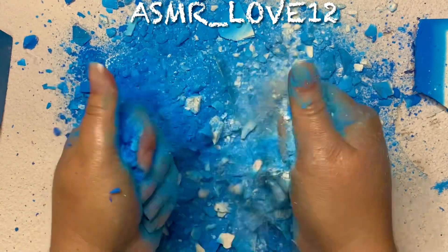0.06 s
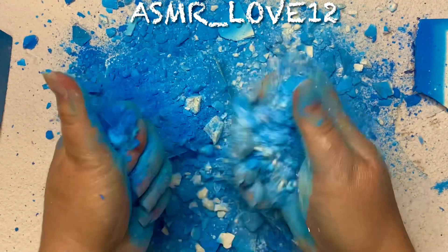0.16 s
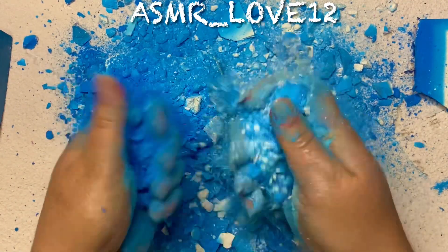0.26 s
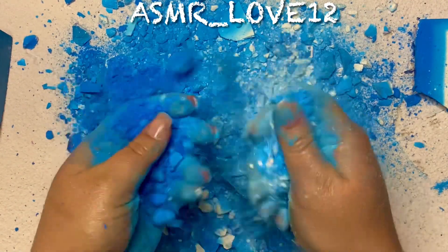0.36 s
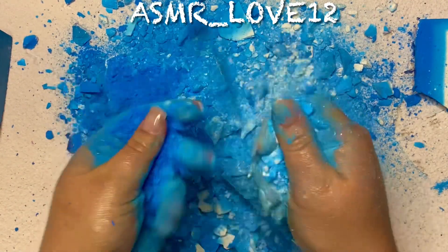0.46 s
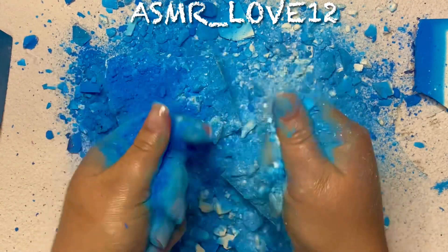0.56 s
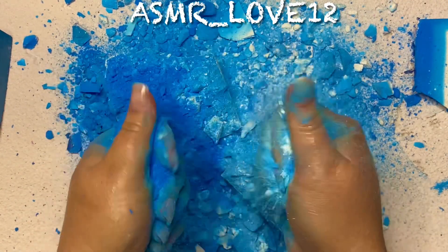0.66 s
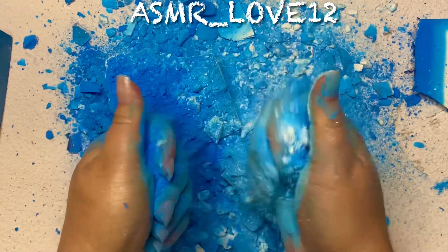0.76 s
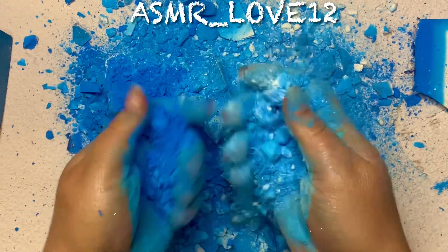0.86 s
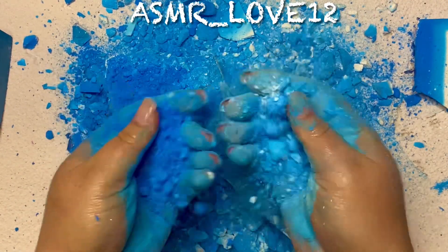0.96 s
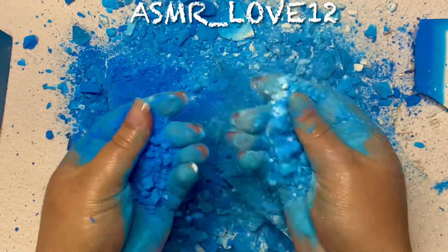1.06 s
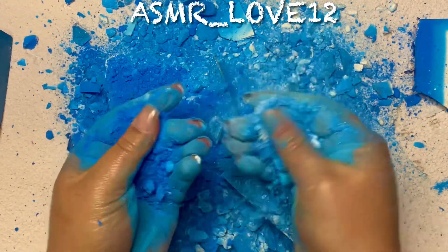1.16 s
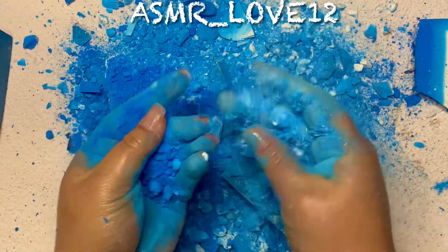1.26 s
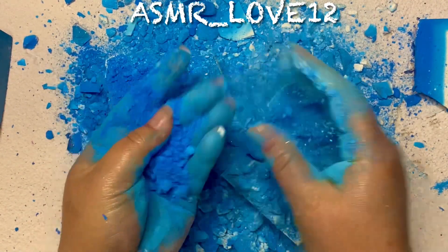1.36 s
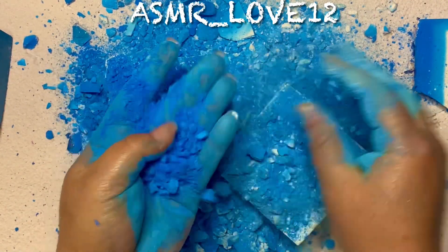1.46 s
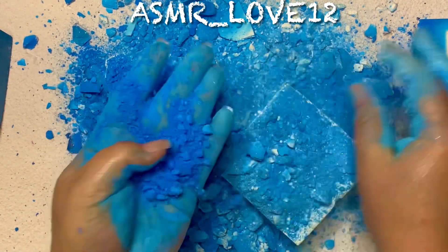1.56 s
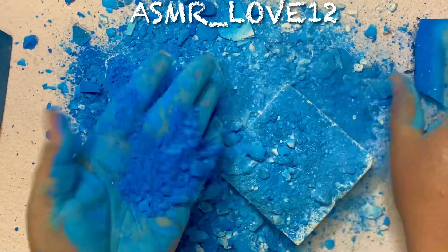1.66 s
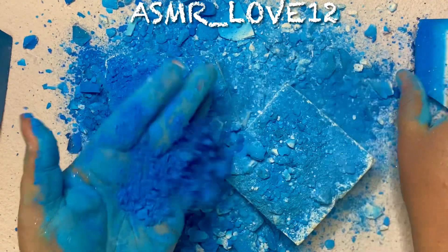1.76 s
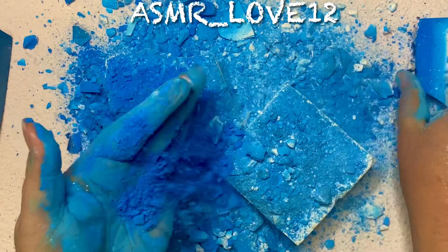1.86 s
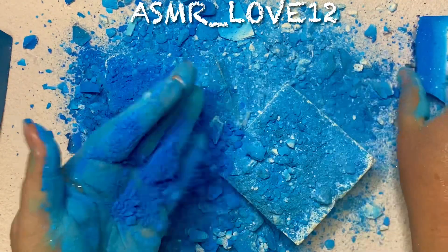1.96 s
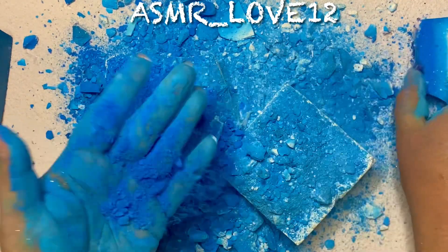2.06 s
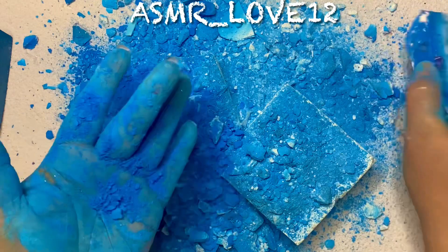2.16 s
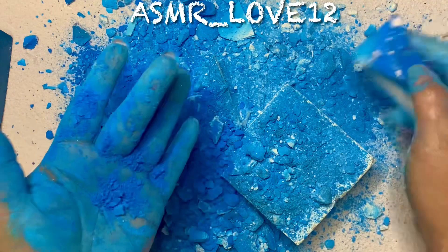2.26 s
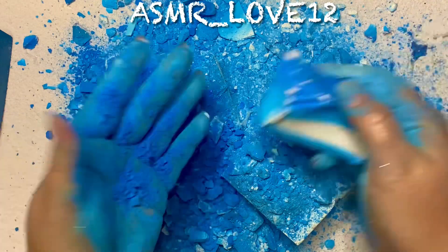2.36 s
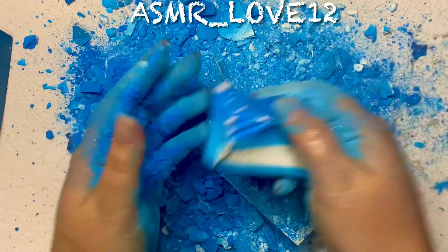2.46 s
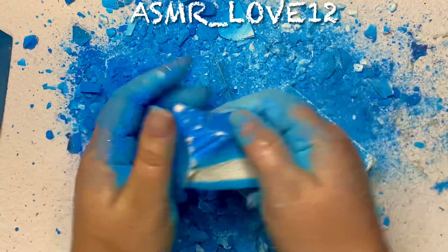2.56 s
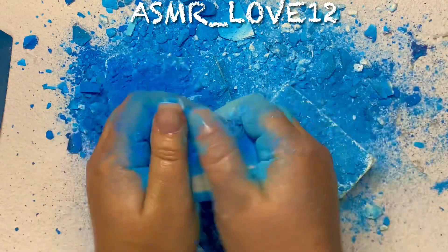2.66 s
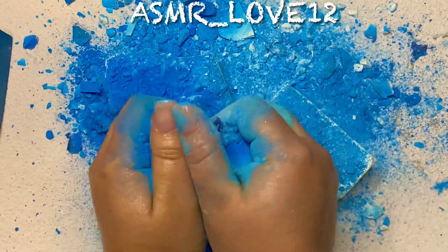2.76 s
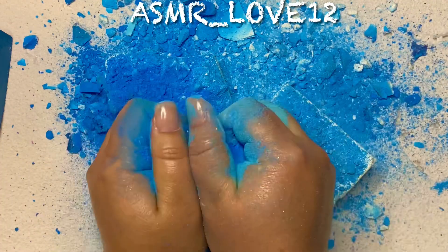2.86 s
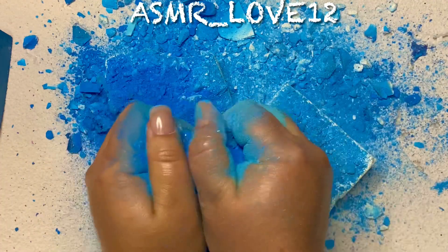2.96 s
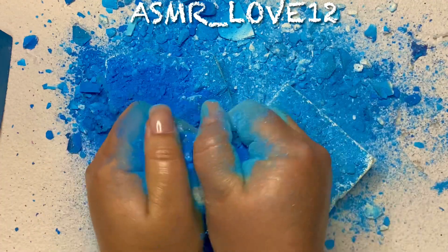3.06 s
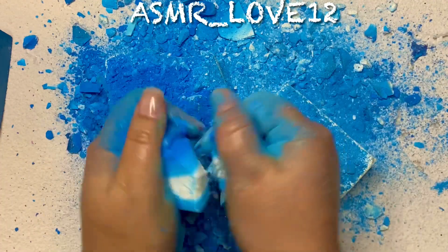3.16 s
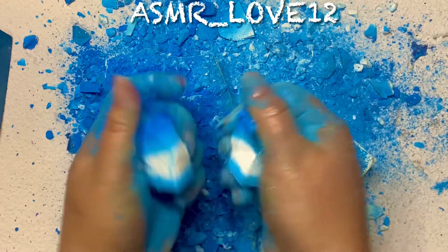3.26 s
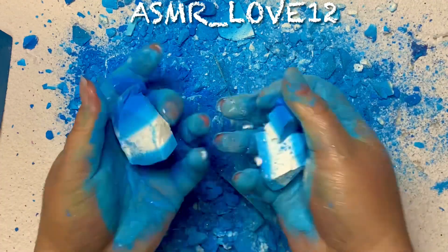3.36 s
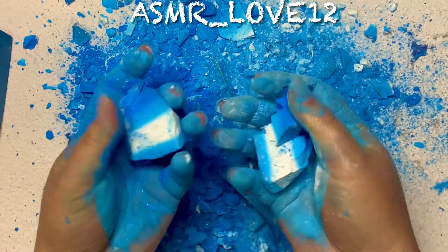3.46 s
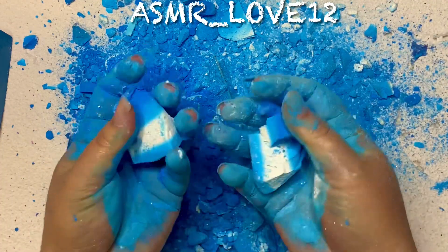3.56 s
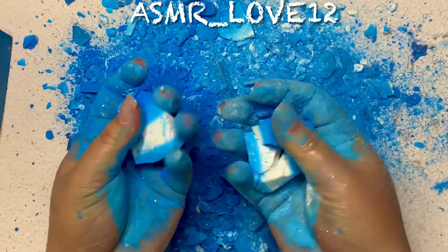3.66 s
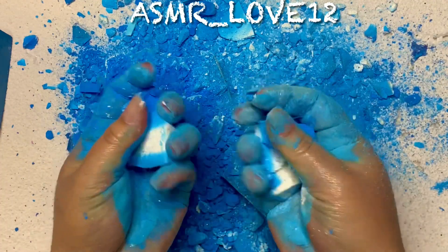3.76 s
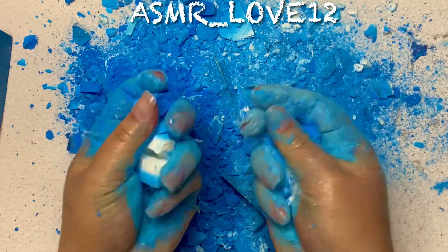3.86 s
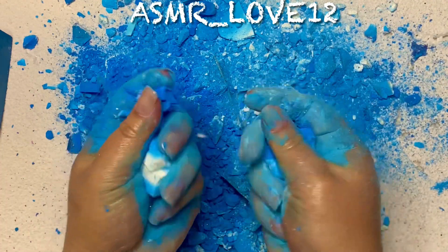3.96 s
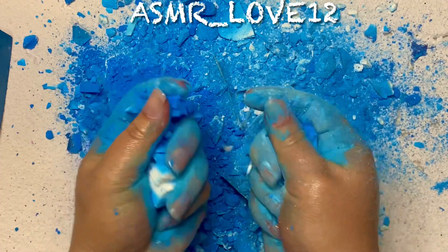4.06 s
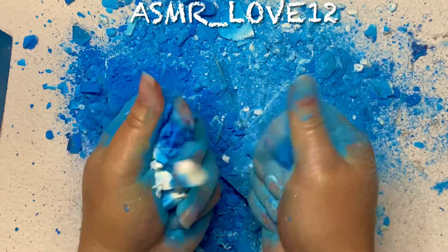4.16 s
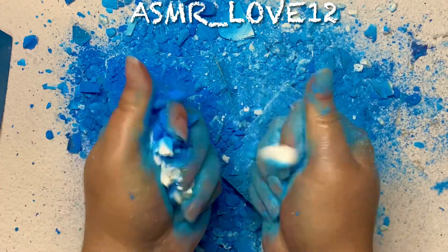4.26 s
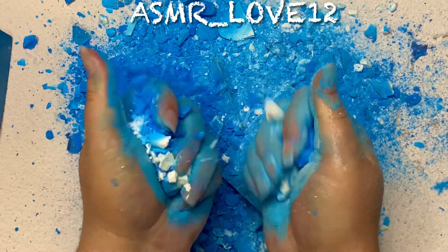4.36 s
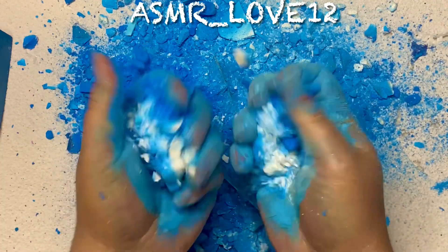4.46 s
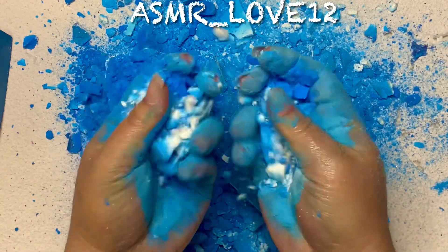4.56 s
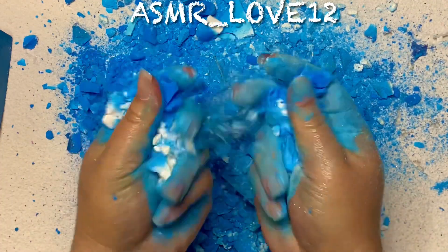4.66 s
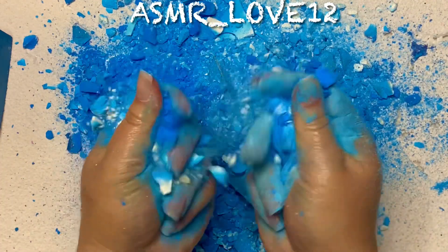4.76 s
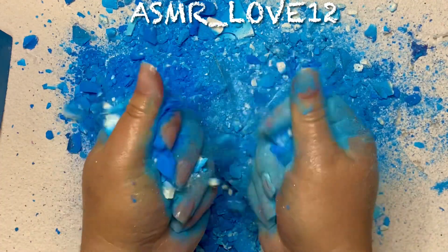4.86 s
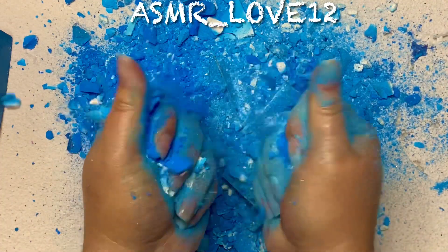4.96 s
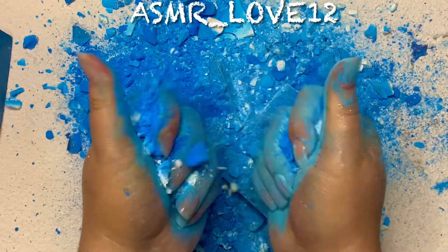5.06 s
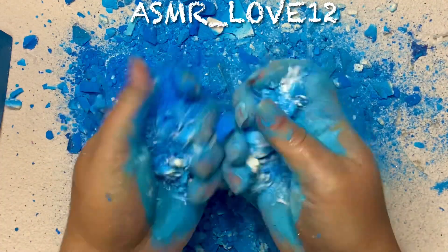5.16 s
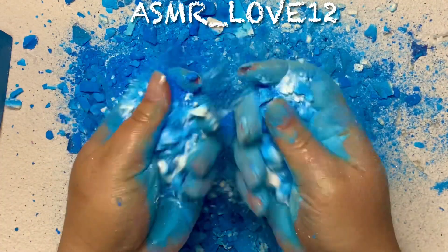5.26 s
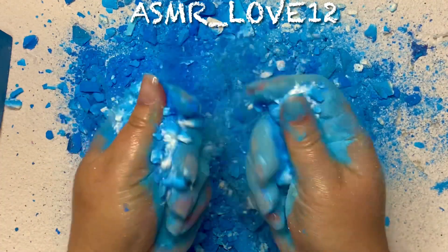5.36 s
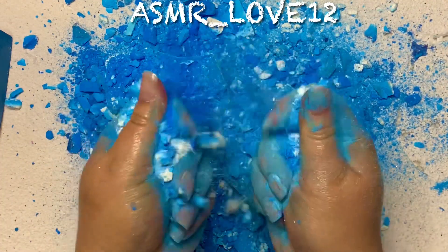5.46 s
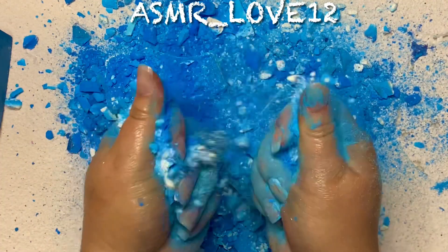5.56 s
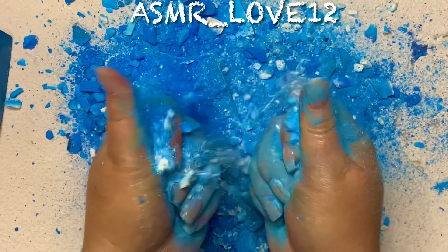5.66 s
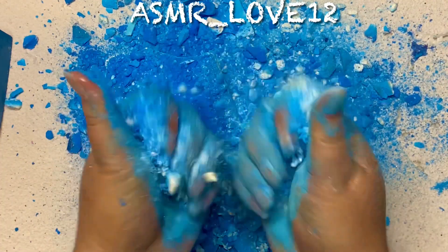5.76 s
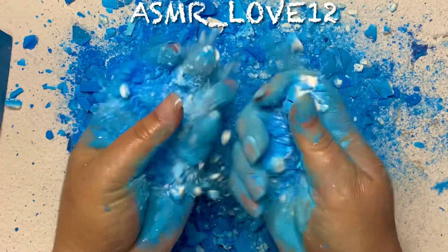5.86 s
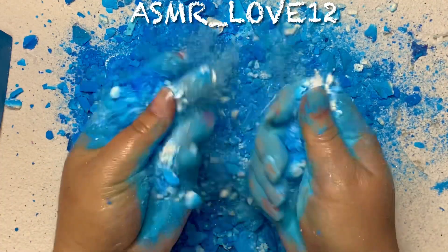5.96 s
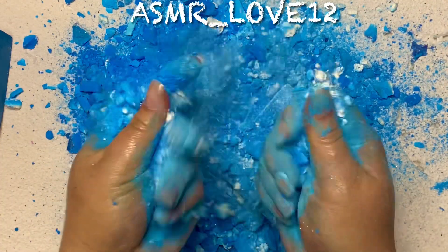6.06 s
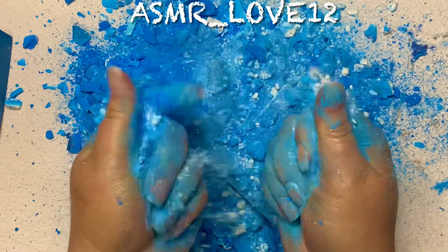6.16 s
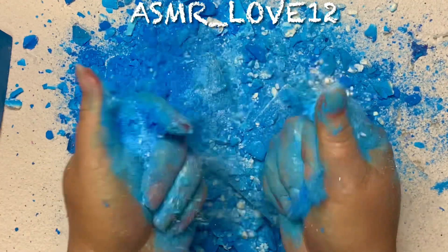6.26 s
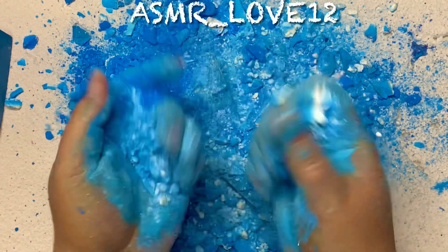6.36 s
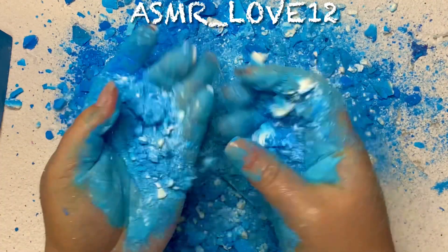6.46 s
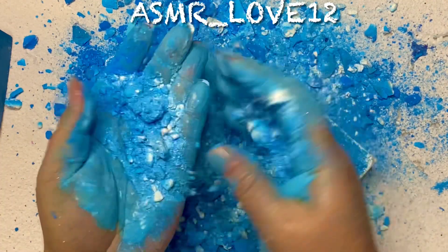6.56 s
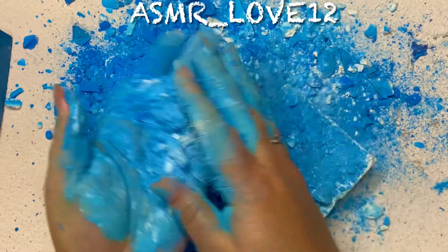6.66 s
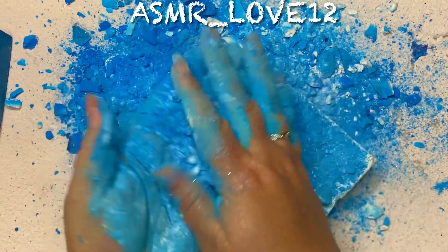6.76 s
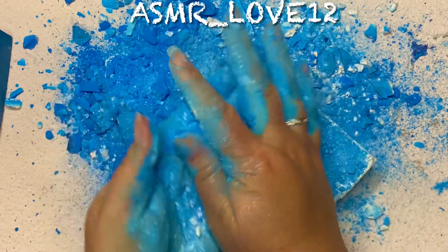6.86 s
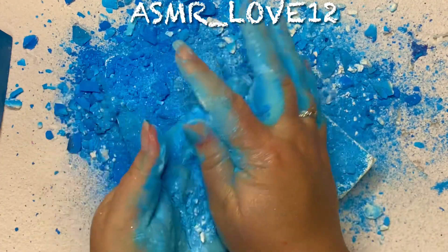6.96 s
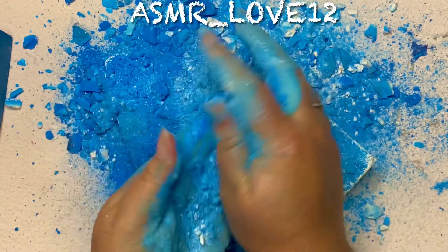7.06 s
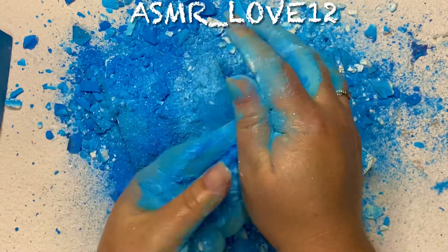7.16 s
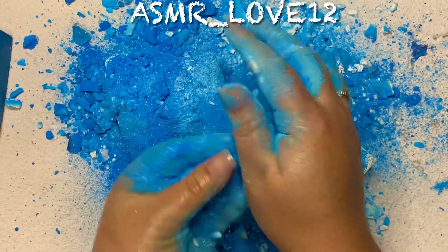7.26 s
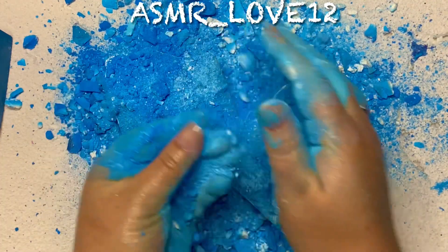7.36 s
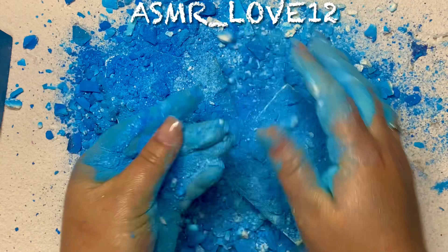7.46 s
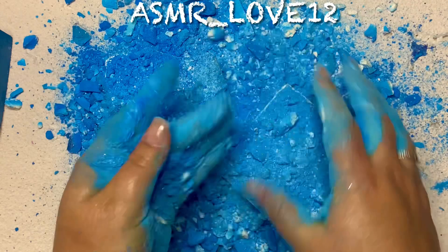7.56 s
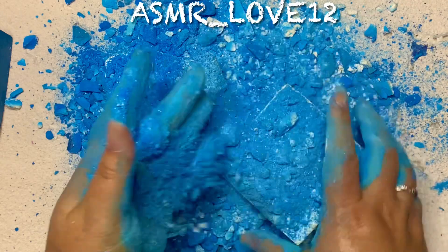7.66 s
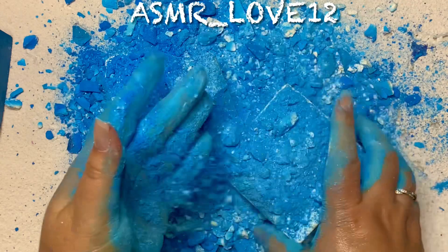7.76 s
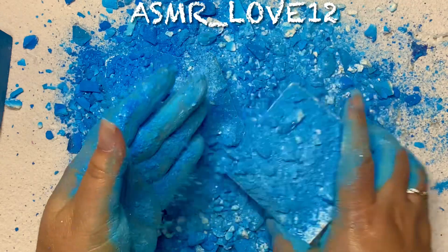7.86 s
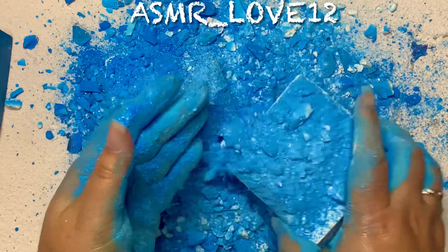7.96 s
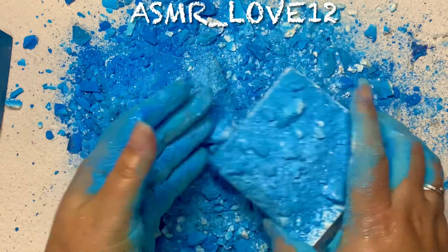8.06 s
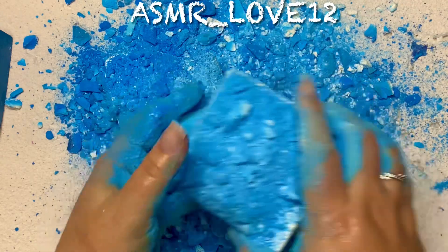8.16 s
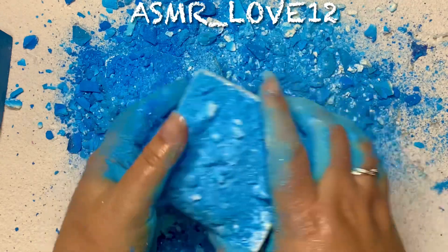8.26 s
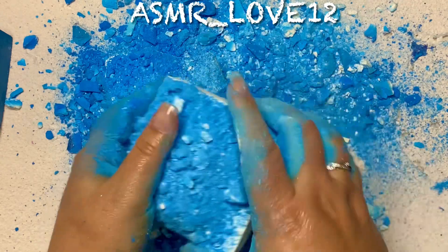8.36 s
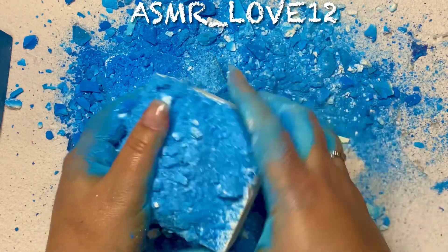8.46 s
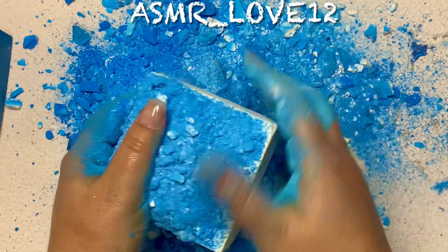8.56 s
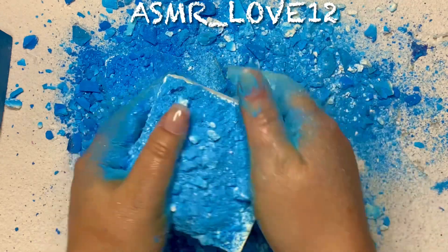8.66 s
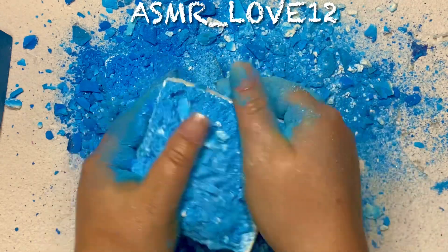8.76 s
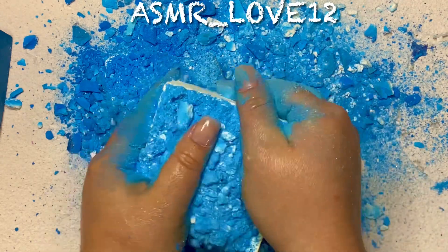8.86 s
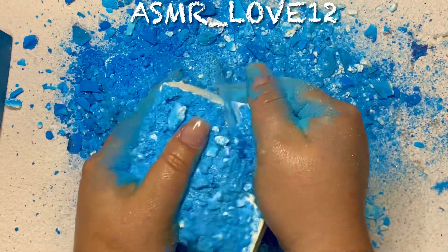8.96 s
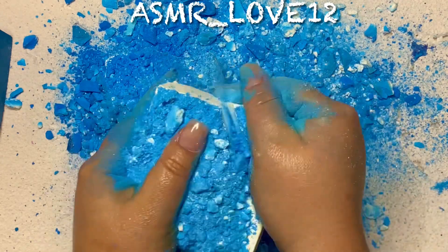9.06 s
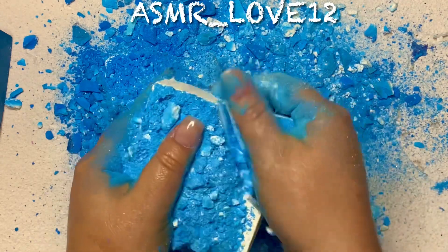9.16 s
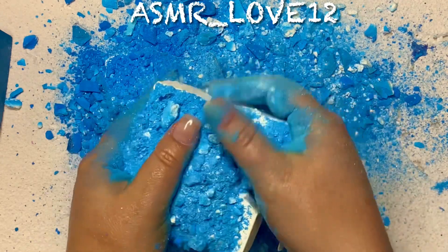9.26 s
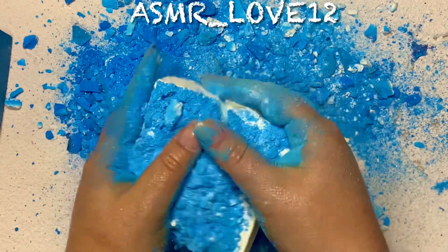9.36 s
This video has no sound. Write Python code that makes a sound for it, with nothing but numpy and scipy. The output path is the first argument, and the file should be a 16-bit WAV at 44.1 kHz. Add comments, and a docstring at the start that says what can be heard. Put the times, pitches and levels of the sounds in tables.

```python
"""Grinding crumbs and a sharp crack, then more cracks: two hands snap dry chalk and crush it to powder, close by.
Grinding is coloured random clicks; cracks are splinter bursts ringing a damped mode; thumps are decaying sines.
Scrapes are resonated slips. The big breaks clip at full scale.
Behind: rumble of the hands (filtered noise), a wavering hum with air noise, a faint cricket of short tones."""
import sys
import numpy as np
from scipy import signal
from scipy.fft import rfft, irfft
from scipy.io import wavfile
from scipy.ndimage import uniform_filter1d

SR = 44100
rng = np.random.default_rng(int(sys.argv[2]) if len(sys.argv) > 2 else 0)


def int16_out(signal):
    """Quantize to a 16-bit WAV file."""
    q = np.round(np.clip(np.atleast_2d(signal).T, -1, 1) * 32767)
    wavfile.write(sys.argv[1], SR, q.astype(np.int16))


N = 414540  # samples

# squeezes and rubs of the hands: last lumps kneaded and palms emptied; block picked up and snapped in two;
# halves crushed in the fists; powder tipped out and brushed off; next block slid up, gripped and broken
# (start [s], build-up [s], easing off [s], grit [dB], dust over grit [dB], share of coarse crumbs [0-1])
STROKES = [ (0, 0.0067, 0.19, -37, -6.5, 0.42), (.15, 0.36, 0.13, -36.5, -7, 0.44),
           (.56, 0.098, 0.14, -37.5, -5.5, .4), (.87, .03, 0.17, -40, -9, 0.26),
           (1.1, 0.02, 0.092, -40.5, -5, 0.48), (1.24, 0.059, 0.25, -41.5, -6.5, 0.47),
           (1.62, 0.17, 0.17, -46.5, -7, 0.95), (2.08, 0.026, 0.085, -61.5, 13, .9),
           (2.39, 0.045, 0.041, -54.5, 2, 0.4), (2.5, 0.14, 0.043, -44.5, -1.5, 0.24),
           (2.915, 0.0092, 0.16, -38, -5.5, 0.4), (3.08, 0.038, 0.059, -43, 3, .15),
           (3.17, 0.051, .11, -43, 3.5, 0.25), (3.43, 0.061, 0.074, -51, 4.5, 0),
           (3.6, 0.19, 0.069, -45, 4.5, 0), (3.759, 0.13, 0.12, -26.5, 1.5, 1),
           (3.94, 0.2, 0.095, -27, -0.5, 0.93), (4.2, 0.2, 0.13, -40, -5, 0.27),
           (4.54, 0.15, 0.052, -26, -5, 0.41), (4.74, 0.047, 0.22, -30.5, -4, 0.66),
           (5.02, 0.058, .07, -37, -8, 0.4), (5.14, 0.21, 0.24, -36, -4.5, 0.3),
           (5.41, 0.12, 0.078, -35, -6.5, 0.48), (5.62, 0.085, 0.11, -37.5, -6.5, 0.3),
           (5.83, 0.22, 0.13, -33.5, -5.5, 0.64), (6.12, 0.17, 0.085, -43, -3.5, 0),
           (6.46, 0.028, 0.13, -46, -9.5, 0.73), (6.62, 0.17, .2, -39, -3, 0.06),
           (6.82, 0.24, 0.096, -32.5, -7.5, 0.31), (7.11, 0.047, 0.088, -35, -6.5, 0.32),
           (7.25, 0.12, 0.21, -46, -4.5, 0.26), (7.66, 0.076, 0.18, -48.5, -8.5, 0.5),
           (8.12, .015, 0.066, -43, -2, 0.1), (8.19, 0.11, 0.14, -41, -6, 0.1),
           (8.6, 0.011, .05, -45.5, 2, 0.05), (8.65, 0.059, 0.1, -42.5, -1, 0),
           (8.85, 0.032, 0.057, -28.5, -4.5, 0.67), (9.08, 0.055, 0.13, -41.5, -1, 0.28),
           (9.24, 0.15, .05, -31.5, -2.5, .7)]
# colours of the grinding and of the finest powder: (frequency [Hz], level [dB])
GRIT_COLOUR = [(40, -13.5), (130, 3.5), (350, 0.5), (700, -1.5), (1300, 0), (2200, 0), (3400, -2),
               (5000, -9.5), (8000, -15.5), (16000, -49)]
DUST_COLOUR = [(800, -56), (2500, -10.5), (4800, -4.5), (7200, -3.5), (9200, -11.5), (12000, -11),
               (15500, -23.5)]
SHEEN_COLOUR = [(3000, -34), (8000, 0), (11000, 3), (15500, -4)]
# hands shift their weight on the table: (start [s], length [s], rumble level [dB])
SHIFTS = [(0, 0.78, -36), (.8, 0.47, -35), (1.304, 0.2, -40), (2.48, 0.37, -37.5), (6.603, 0.18, -33),
          (6.896, 0.23, -31.5), (8.573, 0.28, -28.5), (9.275, 0.2, -27.5)]
# colours of the hands' rumble and the room's air: (frequency [Hz], level [dB])
RUMBLE_COLOUR = [(10, -11.5), (30, -8.5), (70, -10), (110, -15), (200, -26), (2000, -76)]
AIR_COLOUR = [(20, 10), (60, -5.5), (150, 5), (230, -9.5), (370, -1), (500, -9.5), (750, -8.5),
              (1100, -20.5), (2500, -28), (7500, -30), (15000, -36)]
# distinct fractures, energies before colouring:
# (time [s], ring energy [dB], ring pitch [Hz], tick energy [dB], splintering decay [s])
CRACKS = [(0.031, -2, 6000, -1, 0.00092), (0.3334, -2, 1420, -3.5, .0033), (0.4476, -7.5, 850, -9, 0.0082),
          (0.8654, -5.5, 2184, -15, 0.0014), (1.435, -25, 5060, -9, 0.0039),
          (1.5363, -15.5, 3840, -17, 0.00066), (1.642, -7.5, 5260, -34, .0006),
          (1.7855, -11, 4150, -36, .0005), (1.9882, -38, 6000, -19, 0.00037),
          (2.1625, -26, 3040, -18, .0005), (2.6347, -6, 2600, -14, 0.0017),
          (2.9173, 18.5, 1794, 18, 0.0014), (2.9888, 3.5, 2400, -17, .0022), (3.113, 11, 1880, -14, 0.0009),
          (3.2617, -20, 6000, -12, .0009), (3.7465, 8.5, 4750, -20, 0.00013), (3.7663, 4, 3350, 7, 0.0072),
          (3.7886, -3, 5000, 10, 0.0022), (3.8028, -9, 6000, 9.5, .0007), (3.8103, 23, 2860, 26.5, 0.0027),
          (3.8528, 8, 3050, 10.5, 0.0066), (3.865, 9.5, 3170, 14, 0.0062), (3.9016, 11, 4700, 0, 0.0018),
          (3.9421, 1, 1990, -5, 0.00067), (3.972, -12, 6000, 4, 0.0006), (4.0433, -2, 5810, 18, 0.0019),
          (4.0558, 6, 1740, 7, 0.0073), (4.1052, 5.5, 1754, 3, 0.00046), (4.1429, 5.5, 830, -3, 0.0007),
          (4.166, 9, 1132, 2, 0.00039), (4.175, 4, 3900, -4, .0004), (4.1971, -13, 5800, 0.5, .0004),
          (4.4858, 0, 5400, -6, 0.025), (4.6705, -1.5, 2300, -18, .0006), (4.7007, -18, 6000, 9, 0.0057),
          (4.7279, -2, 2400, 3, 0.00068), (4.7885, -2, 1650, 8.5, 0.0055), (4.826, -1.5, 1500, 3, 0.0032),
          (4.8597, 8, 5600, 1, 0.00031), (4.863, -3, 2100, 4.5, 0.0039), (4.9517, 4.5, 4480, 4.5, 0.00077),
          (4.9903, -9, 3140, -9, 0.00076), (5.4072, -8, 930, -0.5, 0.00049),
          (5.4382, 10, 2840, .5, 0.00051), (6.022, 5.5, 3660, -8, 0.00052),
          (6.0515, -26, 3900, -2.5, 0.00096), (6.6368, -10.5, 2120, -39, 0.00056),
          (7.2984, -6.5, 3400, -8.5, 0.0011), (7.3389, -3, 1070, -41, 0.00034),
          (8.8085, -11, 1480, -25, 0.00045), (8.8576, 12, 2660, -1.5, 0.00054),
          (8.9103, 5, 2160, 9, 0.0024), (8.918, 7, 4400, -16, .0005), (8.933, -5, 4550, 2.5, 0.00071),
          (9.2669, 4.5, 3330, -29, 0.00058), (9.3664, 8, 1960, 2, 0.0005)]
# colours of a fracture's ring and bright tick: (frequency [Hz], level [dB])
RING_COLOUR = [(60, 12), (250, 11.5), (700, 0.5), (1200, 2), (2000, 1.5), (4000, -0.5), (7000, -3.5),
               (15000, -14.5)]
TICK_COLOUR = [(1000, -2), (3500, 2), (6000, 0), (9000, -2.5), (12500, -7), (16000, -13.5)]
# reverberation: (frequency [Hz], t60 [s])
ROOM_T60 = [(700, 0.089), (1800, 0.37), (4000, 0.29), (14000, 0.33)]
# runs of evenly spaced chirps: (start [s], end [s], chirp period [s])
CHIRP_RUNS = [(.285, 5.9, .4572), (6.155, 9.4, .4425)]
# dull bumps of hands and blocks: (time [s], level before the envelope [dB], pitch [Hz], decay [s])
THUMPS = [(0.33, -11.5, 92.8, 0.0019), (1.437, -19, 155.4, 0.0033), (2.553, -14, 130, 0.0025),
          (2.632, -7.5, 141, 0.0012), (2.9192, -7, 51.6, 0.018), (2.9206, -11, 150, 0.007),
          (3.247, -14, 298, 0.00097), (3.784, -11, 73, 0.021), (3.8108, 3, 233, 0.0034),
          (3.8118, 5, 62, 0.0084), (3.863, -2.5, 104, 0.0046), (4.106, -8.5, 527, 0.0013),
          (4.1427, -2.5, 386, 0.0014), (4.1667, 7, 637, 0.00045), (7.152, -10, 107, 0.0049),
          (8.8559, 5, 365, 0.0016), (8.865, -2.5, 61.2, 0.011), (8.9086, -4.5, 51.7, 0.021),
          (8.91, 2, 383, 0.0018), (9.348, -14, 65, 0.0086), (9.368, 6, 202, 0.00044)]
# block's face dragged over skin or chalk: (start [s], length [s], pitch [Hz], level [dB])
SCRAPES = [(2.536, 0.11, 2710, -45), (2.98, 0.29, 1770, -50.5), (3.172, 0.072, 2680, -43.5),
           (6.947, 0.14, 2100, -35), (8.625, 0.16, 2150, -46)]

# loose powder trickling between strokes
REST_GRIT_DB, REST_DUST_DB, REST_COARSE = -56, -62.5, 0.75
# rounded rise; fall that speeds up, EASE_DB down after the easing time
BUILD_SHAPE, EASE_SHAPE, EASE_DB = 0.54, 1.31, 12.5
RUMBLE_REST_DB, RUMBLE_PUSH_DB = -41.5, -28.5
RUMBLE_FOLLOW, RUMBLE_SMOOTH_S = 0.63, 0.12  # dB of push per dB of grit; averaging window
# small random fractures; the rate is for all-coarse chalk
SNAPS_PER_S, SNAP_OVER_GRIT_DB, SNAP_TICK_OVER_DUST_DB, SNAP_SPREAD_DB = 22, 22, 23.5, 3.5
SNAP_HZ, SNAP_SPREAD_OCTAVES, SNAP_DECAY_S = 3150, 0.99, 0.00035
CHIRP_SPREAD_DB = 1.8  # wing strokes vary in strength
CUTOFF_HZ = 15900


def amp(db):
    """Decibels to amplitude."""
    return 10 ** (np.asarray(db) / 20)


def unit_rms(x):
    """Scales to RMS 1."""
    return x / np.sqrt(np.mean(x ** 2) + 1e-20)


def unit_energy(x):
    """Scales to energy 1."""
    return x / np.sqrt(np.sum(x ** 2) + 1e-20)


def read(points, hz):
    """A table's value at hz, interpolated over log frequency."""
    f, value = np.transpose(points)
    return np.interp(np.log(hz + 1), np.log(f + 1), value)


def add(mix, start_s, sound):
    """Mixes a sound in at start_s."""
    part = mix[round(start_s * SR):][:len(sound)]
    part += sound[:len(part)]


def colour(x, points, size=4096):
    """Minimum-phase filter with the given spectrum: clicks keep their sharp fronts."""
    log_gain = np.log(amp(read(points, abs(np.fft.fftfreq(size, 1 / SR)))))
    taps = np.fft.ifft(np.exp(np.conj(signal.hilbert(log_gain)))).real
    return signal.oaconvolve(x, taps[:size // 2])[:len(x)]


def resonate(x, hz, q):
    """One damped mode, gain 1 at its centre."""
    b, a = signal.iirpeak(hz, q, fs=SR)
    return signal.lfilter(b, a, x)


def wander(hz):
    """Slow random curve of RMS 1, up to about the given rate."""
    steps = rng.standard_normal(N // 50)
    position = np.arange(N) * 2 * hz / SR
    return unit_rms(np.interp(position, np.arange(len(steps)), steps))


def grains(per_s, spread_db, limit):
    """Random clicks of either sign: many small, a few large."""
    size = amp(spread_db * np.minimum(rng.exponential(1, N), limit))
    sign = rng.choice([-1, 1], N)
    return size * sign * (rng.random(N) < per_s / SR)


def effort():
    """Each stroke builds up and trickles away: grit [dB], dust [dB], share of coarse crumbs."""
    t = np.arange(SR) / SR
    grit = np.full(N, amp(REST_GRIT_DB) ** 2)
    dust = np.full(N, amp(REST_DUST_DB) ** 2)
    lumps = REST_COARSE * grit
    for start_s, build_s, ease_s, db, dust_over_grit_db, coarse in STROKES:
        rise = np.minimum(t / build_s, 1) ** BUILD_SHAPE
        fall_db = EASE_DB * (np.maximum(t - build_s, 0) / ease_s) ** EASE_SHAPE
        power = (rise * amp(db - fall_db)) ** 2
        add(grit, start_s, power)
        add(dust, start_s, power * amp(dust_over_grit_db) ** 2)
        add(lumps, start_s, power * coarse)
    return 10 * np.log10(grit), 10 * np.log10(dust), np.clip(lumps / grit, .12, .9)


def crumbs(per_s, spread_db, q, count=10):
    """Crumbs of many sizes break: each a click and a very short ring at its own pitch."""
    clicks = grains(per_s, spread_db, limit=3.6)
    kind = rng.integers(0, count, N)
    pitches_hz = np.geomspace(1100, 12000, count)
    rings = sum(resonate(clicks * (kind == k), hz, q) for k, hz in enumerate(pitches_hz))
    return unit_rms(0.64 * clicks + rings)


def patches(x, depth_db, size=256):
    """Fingers shift around the crumbs: the colour changes from moment to moment."""
    z = signal.stft(x, SR, nperseg=size)[2]
    field = uniform_filter1d(rng.standard_normal(z.shape), size=6, axis=0)  # over frequency
    field = uniform_filter1d(field, size=14, axis=1)  # over time
    return signal.istft(z * amp(depth_db * unit_rms(field)), SR, nperseg=size)[1][:N]


def crumbling(grit_db, dust_db, coarse):
    """Powder shears in a dense fizz while coarser crumbs crackle; both come in clumps."""
    powder = unit_rms(grains(per_s=11000, spread_db=0.0, limit=5))
    crackle = crumbs(per_s=800, spread_db=9.0, q=7.0)
    drive = np.sqrt(1 - coarse) * powder + np.sqrt(coarse) * crackle
    drive = drive * amp(2.2 * np.tanh(wander(hz=79.1)))
    # random signs: dust bursts with each crumb, without its ring
    dust_drive, sheen_drive = drive * rng.choice([-1, 1], (2, N))
    sheen_db = dust_db + .5 * (dust_db - grit_db) - 2.0  # finer powder, more top octave
    grit = amp(grit_db) * unit_rms(colour(drive, GRIT_COLOUR))
    dust = amp(dust_db) * unit_rms(colour(dust_drive, DUST_COLOUR))
    sheen = amp(sheen_db) * unit_rms(colour(sheen_drive, SHEEN_COLOUR))
    return patches(grit + dust + sheen, depth_db=2.5)


def hands(grit_db):
    """Low rumble of the moving hands: swells with smoothed effort and with shifts of weight."""
    push = amp(RUMBLE_FOLLOW * (grit_db - grit_db.max()))
    push = uniform_filter1d(push, round(RUMBLE_SMOOTH_S * SR))
    power = amp(RUMBLE_REST_DB) ** 2 + (amp(RUMBLE_PUSH_DB) * push) ** 2
    for start_s, length_s, db in SHIFTS:
        add(power, start_s, amp(db) ** 2 * np.hanning(round(length_s * SR)))
    return np.sqrt(power) * unit_rms(colour(rng.standard_normal(N), RUMBLE_COLOUR, size=16384))


def hum(hz=120.1, db=-39.5):
    """A motor's slightly wavering hum over the soft rush of the room's air."""
    turns = np.cumsum(hz + 1.325 * wander(hz=3.86)) / SR
    tone = amp(db + 0.22 * wander(hz=27)) * unit_rms(np.sin(2 * np.pi * turns))
    return tone + amp(-46.0) * unit_rms(colour(rng.standard_normal(N), AIR_COLOUR))


def small_snaps(grit_db, dust_db, coarse, count=600):
    """Lumps give way at random, oftener in coarse chalk, louder under a hard squeeze; rows as in CRACKS."""
    rows = []
    spread = np.sqrt(3) * rng.uniform(-1.1, 1, (count, 3))
    places, draws = rng.integers(0, N, count), rng.random(count)
    for at, draw, (strength, pitch, tick) in zip(places, draws, spread):
        if draw * count < SNAPS_PER_S * coarse[at] ** 2 * N / SR:
            ring_db = grit_db[at] + SNAP_OVER_GRIT_DB + SNAP_SPREAD_DB * strength
            ring_hz = SNAP_HZ * 2 ** (SNAP_SPREAD_OCTAVES * pitch)
            tick_db = dust_db[at] + SNAP_TICK_OVER_DUST_DB + SNAP_SPREAD_DB * tick
            rows.append((at / SR, ring_db, ring_hz, tick_db, SNAP_DECAY_S))
    return rows


def disperse(x, lag_s, hz=2000):
    """Bending waves: a snap's treble crosses the chalk first, lower tones arrive later."""
    f = np.fft.rfftfreq(len(x), 1 / SR)
    turns = lag_s * (2 * np.sqrt(hz * f) - f * np.sqrt(2 * hz / SR))
    return irfft(rfft(x) * np.exp(-2j * np.pi * turns), len(x))


def cracks(rows, size=2048):
    """A fracture is one snap and a dying run of splinters, which ring the broken piece."""
    rings, ticks, t = np.zeros(N), np.zeros(N), np.arange(size) / SR
    for time_s, ring_db, ring_hz, tick_db, decay_s in rows:
        chance, height = rng.random(size), rng.standard_normal(size)
        height = height * abs(height) ** 0.5  # a few splinters much larger than the rest
        run = np.exp(-t / decay_s) + 0.055 * np.exp(-t / 0.01)  # debris follows the split
        splinters = height * (chance < 7500 / SR) * run
        splinters[0] = 2.3  # the snap
        splinters = disperse(splinters, lag_s=0.0005124)
        piece = resonate(splinters, ring_hz, q=2.7) + 0.091 * splinters
        add(rings, time_s, amp(ring_db) * unit_energy(piece))
        add(ticks, time_s, amp(tick_db + 4.5) * unit_energy(splinters))
    return colour(rings, RING_COLOUR) + colour(ticks, TICK_COLOUR)


def room(size=256):
    """Echo response: close reflections from the table, then the small room's faint tail."""
    hz, t, z = signal.stft(rng.standard_normal(SR // 2), SR, nperseg=size)
    decay = amp(-60 * t / read(ROOM_T60, hz)[:, None])
    tail = signal.istft(z * decay, SR, nperseg=size)[1]
    t = np.arange(len(tail)) / SR
    near = rng.standard_normal(len(t)) * np.exp(-t / 0.0028) * (t > .002)
    return amp(-17.0) * unit_energy(near) + amp(-26) * unit_energy(tail)


def cricket(hz=4610, stroke_gap_s=.048, stroke_s=0.034, sag_hz=380, db=-41.5, count=3):
    """Three wing strokes a chirp: tones that swell, fade and sag as the wing slows; distance blurs them."""
    out, u = np.zeros(N), np.arange(0, 1, 1 / (stroke_s * SR))
    swell = np.interp(u, [0, .25, .55, 1], [0.43, 0.95, 0.53, 0.27])
    pitch_hz = hz - sag_hz * np.clip(2 * u - 1, 0, 1)
    stroke = swell * np.sin(2 * np.pi * np.cumsum(pitch_hz) / SR)
    t = np.arange(SR // 6) / SR
    for chirp_s in np.concatenate([np.arange(*run) for run in CHIRP_RUNS]):
        for k in range(count):
            paths = .5 * unit_energy(rng.standard_normal(len(t)) * t * np.exp(-t / 0.011))
            paths[0] += 1  # direct sound
            gain = amp(db + CHIRP_SPREAD_DB * rng.standard_normal())
            add(out, chirp_s + k * stroke_gap_s, gain * signal.fftconvolve(stroke, paths))
    return out


def thumps():
    """Palms close on a sudden gap, or a block is gripped: a low push that dies quickly."""
    out, t = np.zeros(N), np.arange(SR // 5) / SR
    for time_s, db, hz, decay_s in THUMPS:
        envelope = np.exp(-t / decay_s) * (1 - np.exp(-t / 0.00017))
        add(out, time_s, amp(db) * np.sin(2 * np.pi * hz * t) * envelope)
    return out


def scrapes():
    """Quick, uneven slips excite one resonance of the block: a hoarse rub."""
    out = np.zeros(N)
    for start_s, length_s, hz, db in SCRAPES:
        slips = grains(per_s=1200, spread_db=15, limit=1.3)[:round(length_s * SR)]
        rub = resonate(resonate(slips, hz, q=2.7), hz, q=2.7)
        add(out, start_s, amp(db) * unit_rms(rub * signal.windows.tukey(len(rub), .7)))
    return out


def scene():
    """Chalk close and nearly dry; rumble, cricket and hum added without the echo; two equal channels."""
    grit_db, dust_db, coarse = effort()
    behind = hands(grit_db) + cricket() + hum()
    echo = room()
    grinding = crumbling(grit_db, dust_db, coarse) + scrapes()
    fractures = list(CRACKS) + small_snaps(grit_db, dust_db, coarse)
    chalk = grinding + thumps() + cracks(fractures)
    mono = chalk + signal.oaconvolve(chalk, echo)[:N] + behind
    return np.array([mono, mono])


def record(dry):
    """The loudest breaks clip at full scale; then a low-pass limits the band."""
    clipped = np.clip(dry, -1, 1)
    lowpass = signal.firwin(255, CUTOFF_HZ, window=("kaiser", 8), fs=SR)
    return signal.oaconvolve(clipped, lowpass[None], "same")


dry = scene()
out = record(dry)
int16_out(out)
```